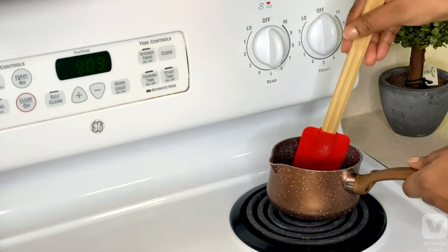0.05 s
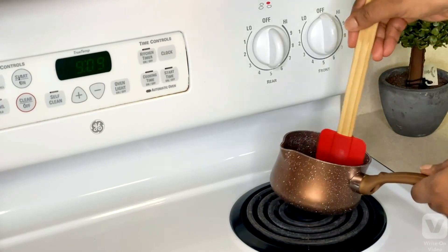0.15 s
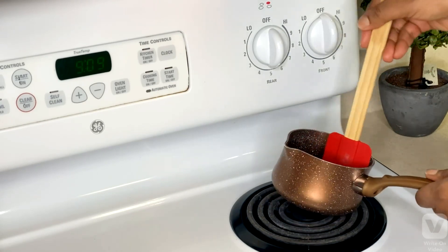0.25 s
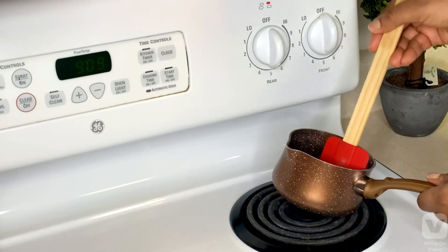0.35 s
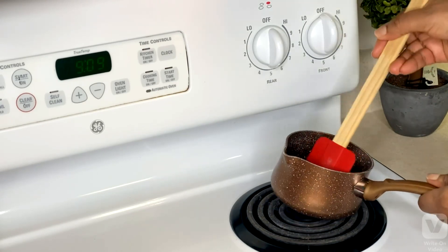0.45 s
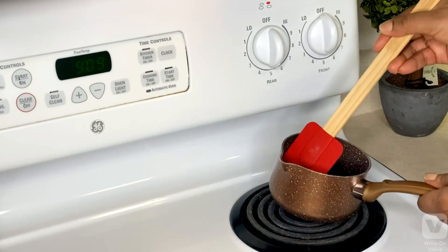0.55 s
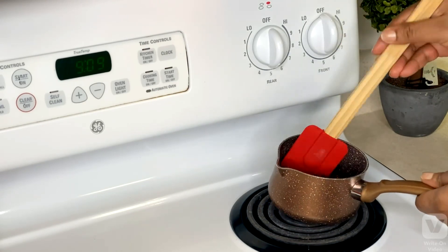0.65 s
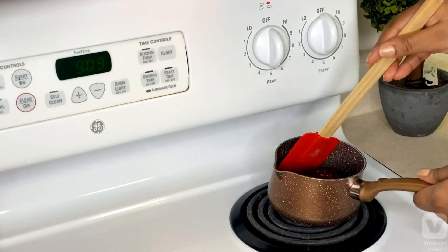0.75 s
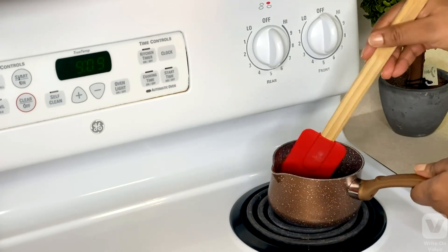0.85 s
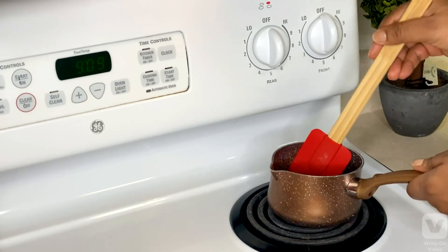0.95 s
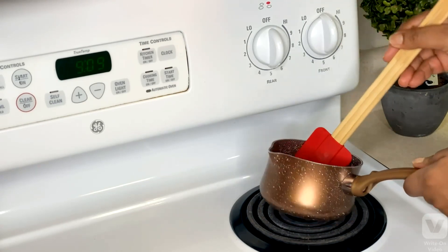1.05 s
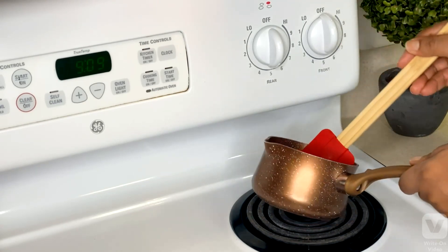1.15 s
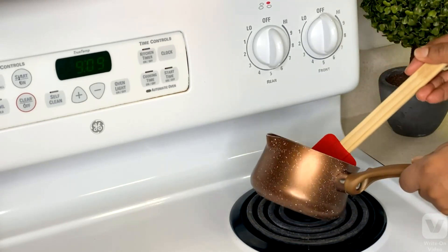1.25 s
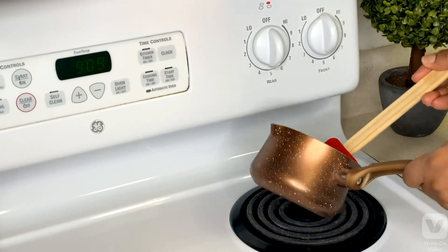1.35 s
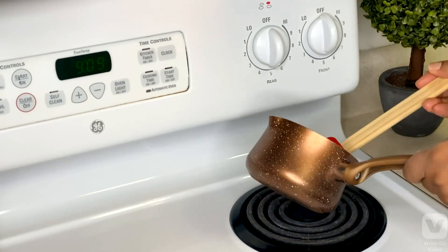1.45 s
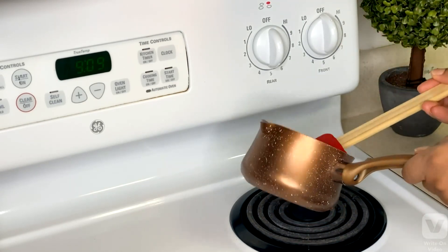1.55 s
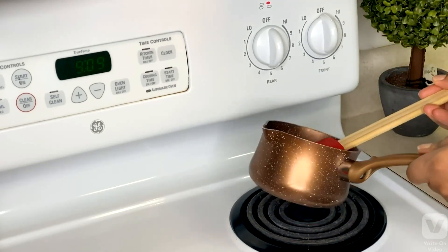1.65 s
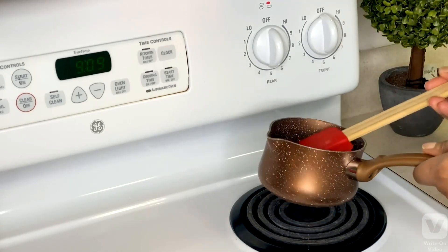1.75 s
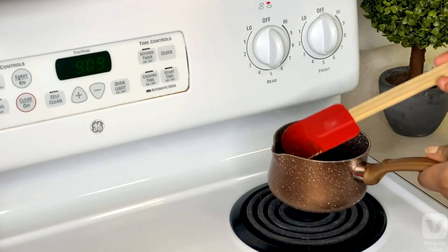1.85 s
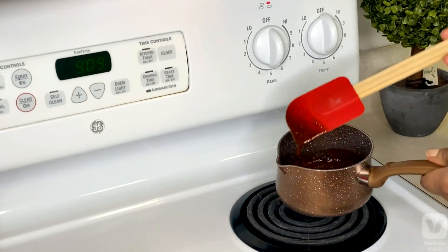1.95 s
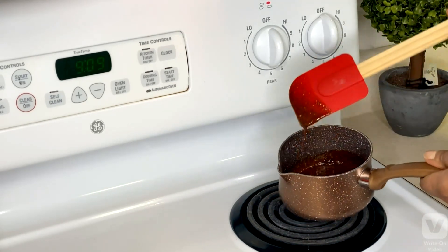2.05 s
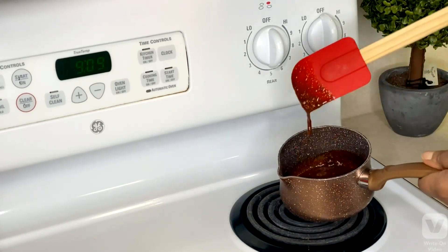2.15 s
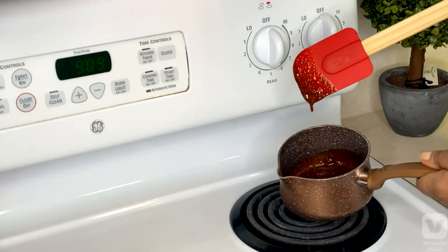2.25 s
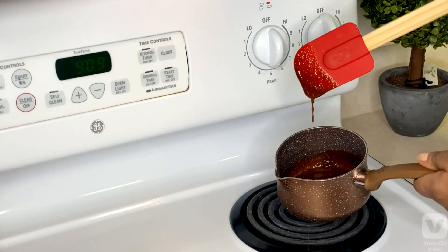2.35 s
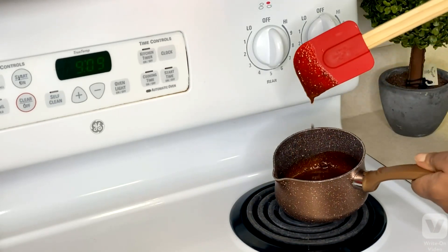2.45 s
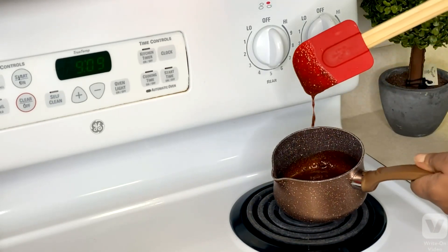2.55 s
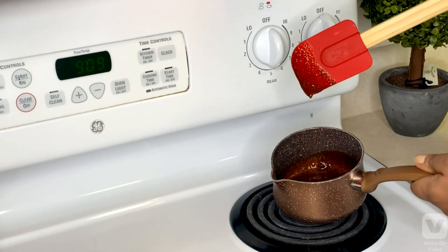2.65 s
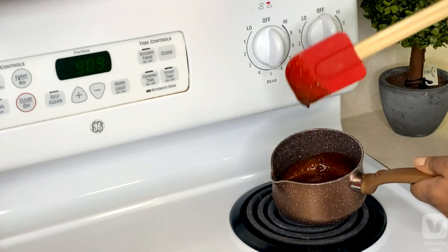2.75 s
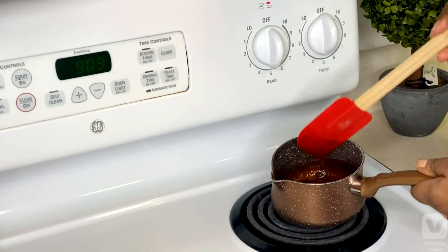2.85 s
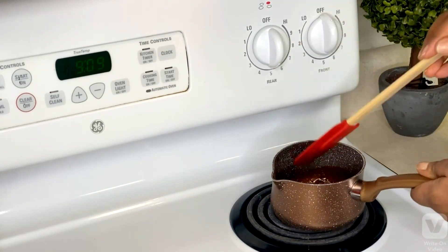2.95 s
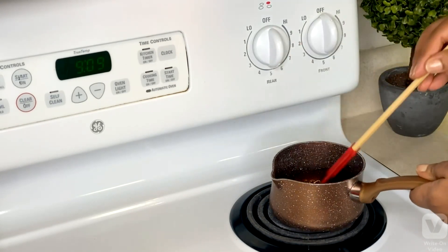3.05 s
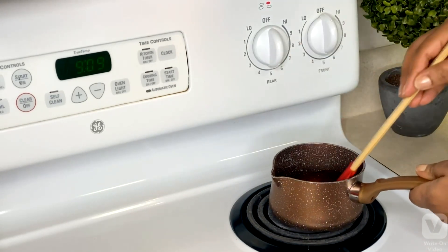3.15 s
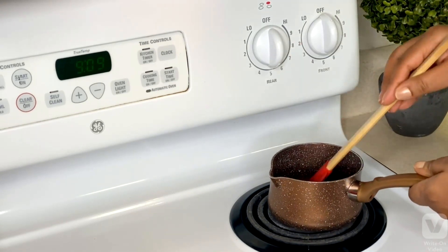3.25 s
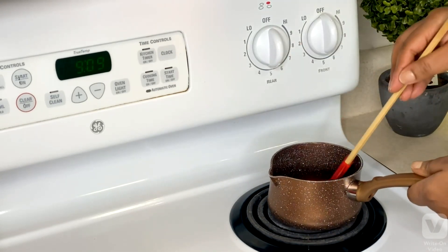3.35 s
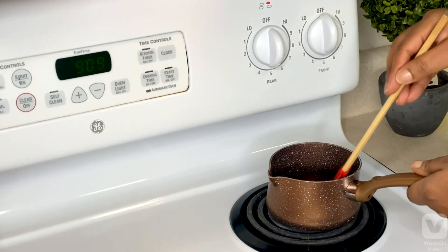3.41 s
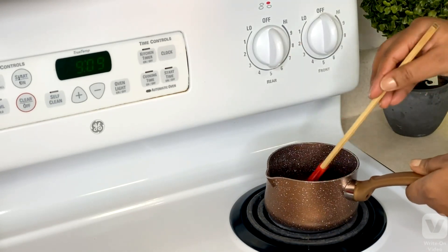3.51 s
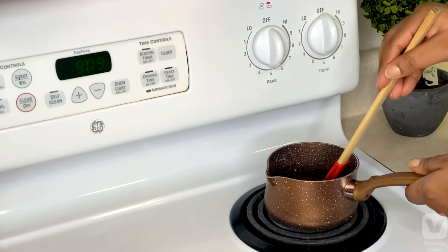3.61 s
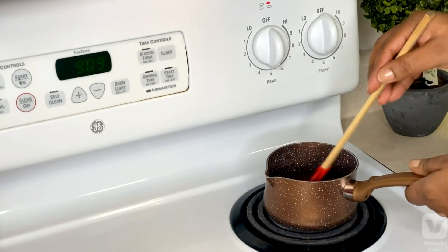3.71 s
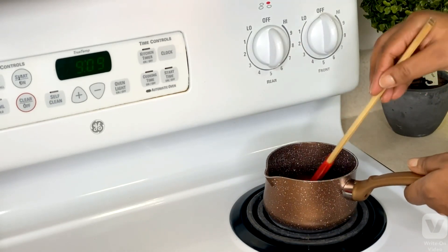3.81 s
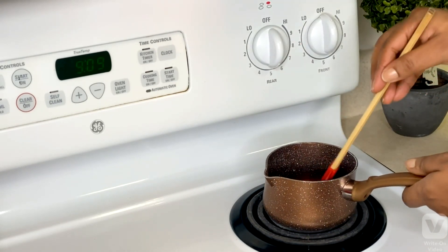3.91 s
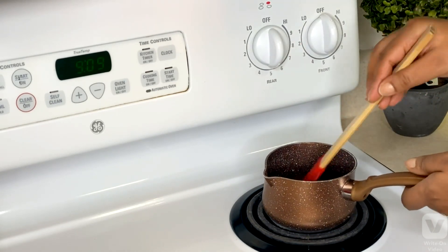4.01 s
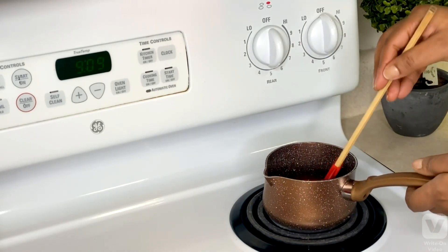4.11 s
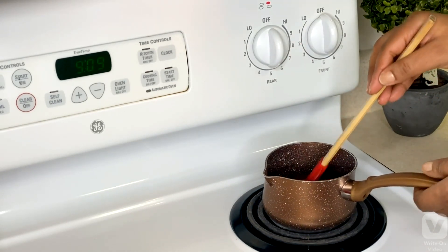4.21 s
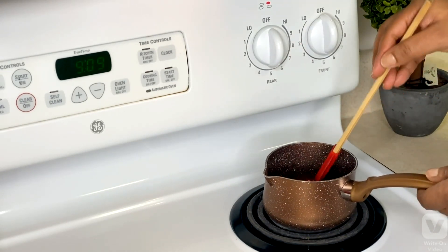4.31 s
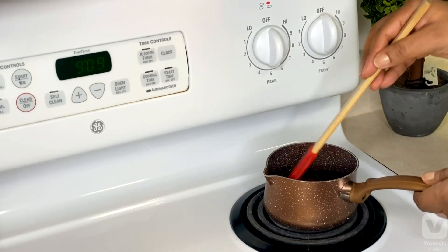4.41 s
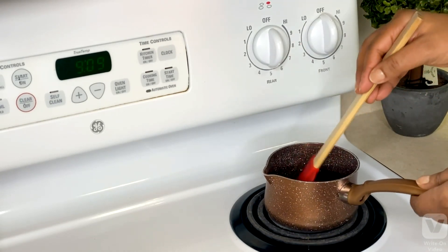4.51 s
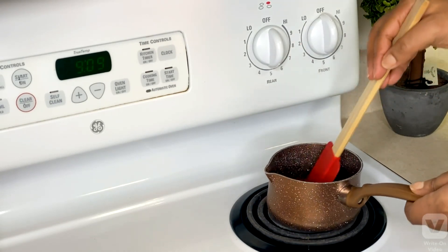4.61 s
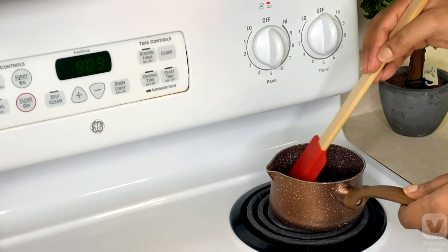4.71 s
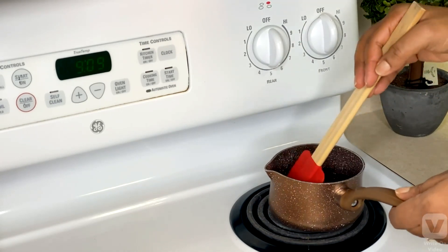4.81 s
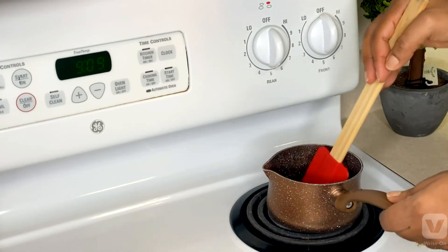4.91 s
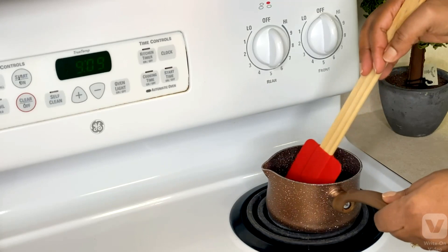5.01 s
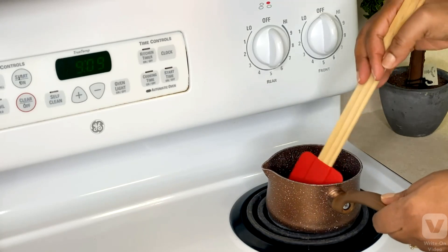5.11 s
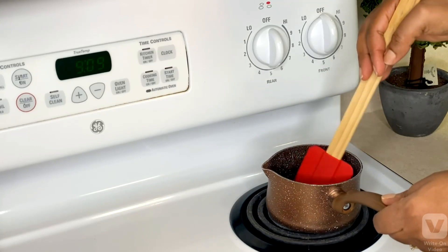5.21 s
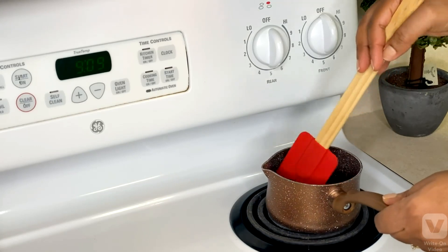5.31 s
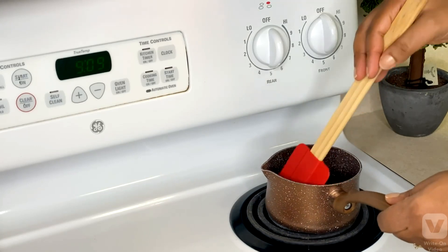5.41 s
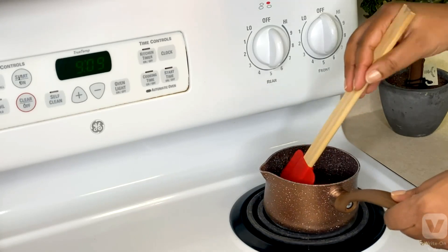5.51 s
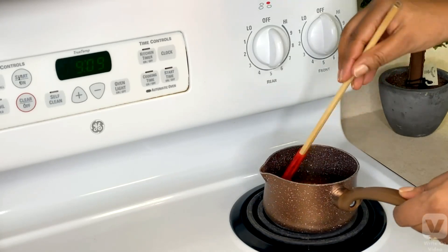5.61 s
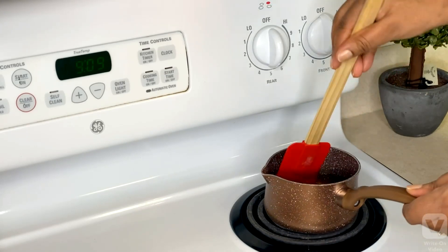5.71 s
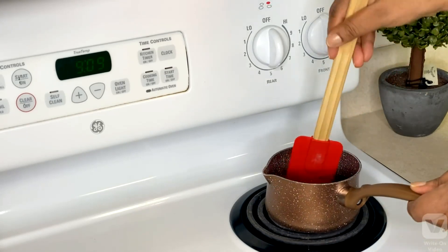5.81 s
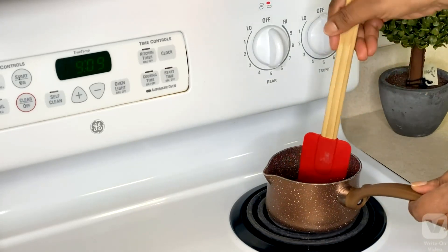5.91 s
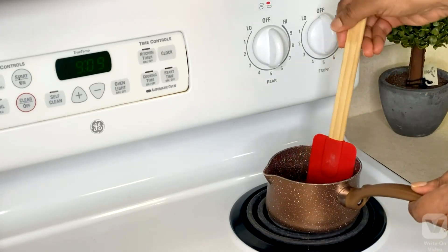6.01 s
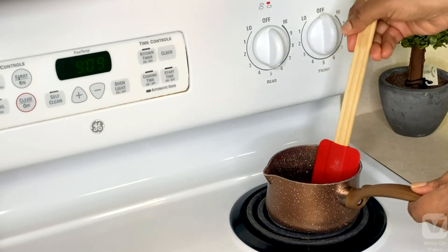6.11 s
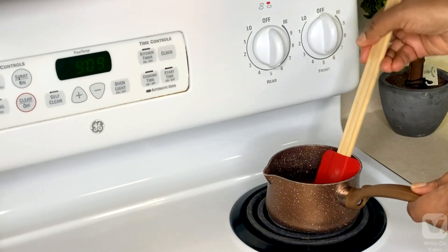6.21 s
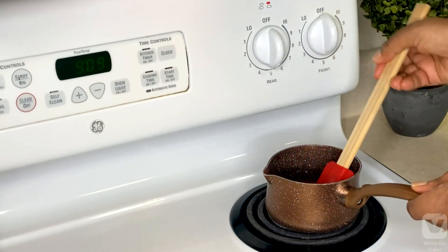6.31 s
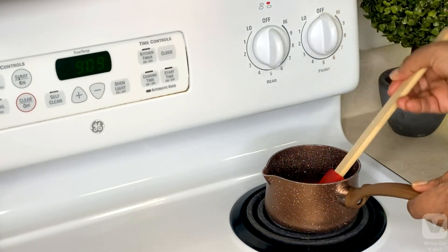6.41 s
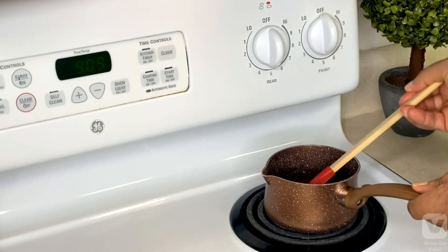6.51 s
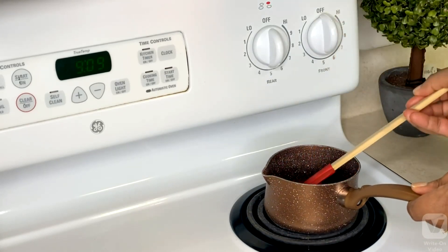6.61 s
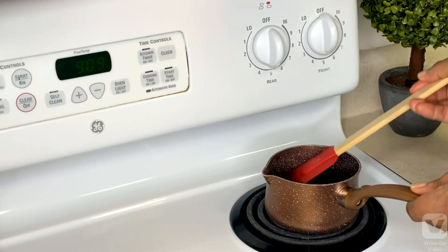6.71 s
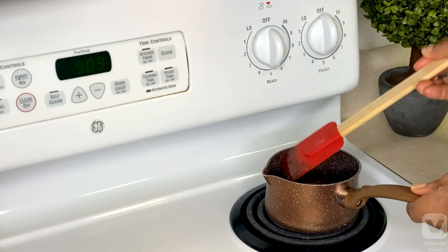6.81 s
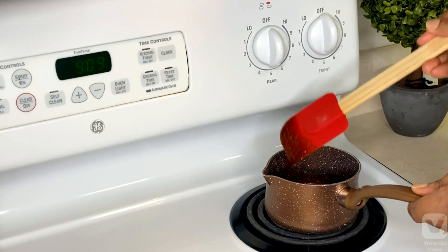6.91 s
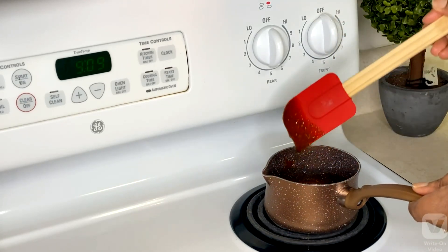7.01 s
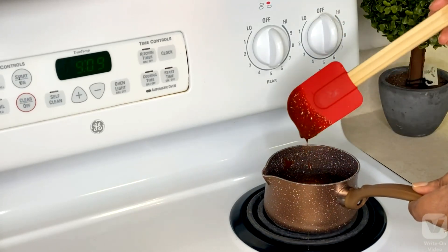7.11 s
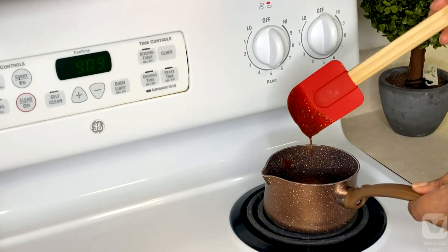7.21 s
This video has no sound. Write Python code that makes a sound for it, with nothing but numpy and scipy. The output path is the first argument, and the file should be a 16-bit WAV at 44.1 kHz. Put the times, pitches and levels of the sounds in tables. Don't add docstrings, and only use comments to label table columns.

```python
import sys
import numpy as np
from scipy import signal
from scipy.fft import rfft, irfft, next_fast_len
from scipy.io import wavfile
from scipy.ndimage import uniform_filter1d

SR = 44100
rng = np.random.default_rng(int(sys.argv[2]) if len(sys.argv) > 2 else 0)


def output_pcm(signal):
    pcm = np.clip(np.atleast_2d(signal).T, -1, 1) * 32767
    wavfile.write(sys.argv[1], SR, np.round(pcm).astype(np.int16))


def makeup_ratio(level_db):
    decades = np.asarray(level_db, float) / 20
    return 10 ** decades


N = 320166
T = np.arange(N) / SR
SPAN = 32768

# (pitch [Hz], level [dB], decay t60 [s])
PAN_MODES = [(198, -4, 0.3), (434, -8, .3), (503, -6, .25), (935, -8, .3), (720, -9, 0.2), (1060, -4, 0.3),
             (1190, -7, 0.3), (1620, -10, 0.3), (1952, -3, 0.25), (2100, -7, 0.17), (2600, -12, 0.25),
             (2960, -3, 0.35), (3322, -8, 0.4), (3472, -17, 0.4), (3760, -11, 0.121), (4040, -9, 0.2),
             (4540, -12, 0.23), (4900, -18, 0.25), (5480, -8, 0.35), (5712, -13, 0.093), (5930, -13, 0.4),
             (6519, -15, 0.46), (6880, -8, 0.25), (7040, -3, 0.4), (8060, -14, 0.2), (9470, -13, 0.3),
             (10030, -16, 0.24), (10410, -23.5, 0.14), (10580, -20, 0.16), (10730, -21, 0.18),
             (11120, -10, 0.4)]
LONGEST_T60 = 0.4


def colour(x, *spectra):
    size = next_fast_len(x.shape[-1] + 4096)
    log_hz = np.log(np.arange(4097) * SR / 8192 + 1)
    db = 0
    for points in spectra:
        hz, level_db = np.array(points).T
        db = db + np.interp(log_hz, np.log(hz), level_db)
    cepstrum = irfft(db * np.log(10) / 20)
    cepstrum[1:4096] *= 2
    cepstrum[4097:] = 0
    response = irfft(np.exp(rfft(cepstrum)))[:4096]
    return irfft(rfft(x, size) * rfft(response, size), size)[..., :x.shape[-1]]


def flat_top(points, top_hz=16000):
    return list(points[:-2]) + [(top_hz, points[-3][1])]


def unit(x):
    return x / np.sqrt(np.mean(x ** 2))


def walk(rate, size=N):
    hold = int(SR / rate)
    steps = np.repeat(rng.standard_normal(size // hold + 2), hold)
    return 1.355 * uniform_filter1d(steps, hold)[hold // 2:][:size]


def sway(spread_db, rate):
    return np.repeat(makeup_ratio(spread_db * walk(32 * rate, size=N // 32 + 1)), 32)[:N]


def ring(x, hz, t60):
    radius = np.exp(-np.log(1000) / (t60 * SR))
    turn = 2 * np.pi * hz / SR
    return signal.lfilter([0, np.sin(turn)], [1, -2 * radius * np.cos(turn), radius ** 2], x)


def grit(size, scatter_db):
    strength_db = scatter_db * np.minimum(rng.exponential(size=size), 3.5)
    return rng.standard_normal(size) * makeup_ratio(strength_db)


def efforts(table, column, rise_db_s, fall_db_s, rest_db):
    t = T[::128]
    power = makeup_ratio(2 * rest_db)
    for row in table:
        start, hold = row[0], row[1]
        early = np.maximum(start - t, 0)
        late = np.maximum(t - start - hold, 0)
        power = power + makeup_ratio(2 * (row[column] - rise_db_s * early - fall_db_s * late))
    return np.interp(T, t, 10 * np.log10(power))


def kitchen():
    # (frequency [Hz], level [dB per Hz])
    rumble_colour = [(15, -62.5), (25, -41.5), (58, -4), (92, -2.5), (121, -3.5), (145, -9.5), (207, -7.5),
                     (311, -13), (492, -22.5), (1030, -38.5), (1330, -34.5), (1430, -38), (8100, -49.5),
                     (9440, -47), (11000, -57), (14300, -90.5), (22000, -120)]
    # (pitch [Hz], level [dB])
    hums = [
        (119, -71),
        (9216, -93.5),
    ]
    noise = colour(rng.standard_normal(N), flat_top(rumble_colour)) * makeup_ratio(0.92 * walk(9.7))
    tones = sum(makeup_ratio(db + 1) * np.sin(2 * np.pi * hz * T) for hz, db in hums)
    return unit(noise) * makeup_ratio(-62.5) + tones


def patches(x, edges_hz, patchy_db, rate):
    spectrum = rfft(x)
    band = np.searchsorted(edges_hz, np.arange(N // 2 + 1) * SR / N)
    out = 0
    for k in range(len(edges_hz) + 1):
        out = out + irfft(spectrum * (band == k), N) * sway(patchy_db, rate)
    return out


def scrape():
    # (start [s], hold [s], wall scrape level [dB], sauce hiss level [dB])
    strokes = [(0, 0.034, -53.5, -61), (.08, 0.14, -70.5, -67.5), (.2, .15, -73, -69),
               (.37, 0.28, -100, -73.5), (.7, 0.12, -67, -70), (.82, 0.076, -64, -67.5),
               (.94, 0.33, -80, -69), (1.29, 0.13, -70, -68), (1.47, 0.27, -94, -69.5),
               (1.82, .6, -82, -87.5), (2.92, 0.077, -66.5, -78), (3.09, 0.11, -73, -63.5),
               (3.2, 0.16, -62, -70), (3.37, 0.049, -61, -63), (3.43, 0.16, -66.5, -67.5),
               (3.58, 0.31, -62, -68.5), (3.97, 0.2, -58, -66), (4.36, 0.03, -67.5, -84),
               (4.4, 0.11, -60.5, -71.5), (4.51, 0.2, -82, -80.5), (4.73, 0.038, -57, -65),
               (4.8, 0.047, -52.5, -63), (5.0, 0.16, -69, -74), (5.3, 0.055, -84, -74),
               (5.42, 0.045, -58.5, -61.5), (5.5, 0.14, -66, -71), (5.69, 0.043, -66, -70),
               (5.75, 0.24, -81, -85), (5.96, 0.48, -68, -74.5), (6.08, 0.33, -83, -72),
               (6.62, 0.06, -83, -92), (6.73, 0.035, -71.5, -65.5), (6.82, 0.62, -90, -101)]
    # (frequency [Hz], level [dB per Hz])
    wall_colour = [(240, -26), (400, -4.5), (606, 2), (780, -18.5), (1040, -3.5), (1120, -6), (2740, -9),
                   (4500, -11.5), (5850, -28), (9900, -120)]
    # (frequency [Hz], level [dB per Hz])
    sauce_colour = [(2060, -16.5), (3500, -10.5), (4700, -9.5), (5700, -3), (6980, -3), (7900, -7.5),
                    (8570, -5.5), (9480, -4.5), (11000, -15.5), (14300, -42.5), (22000, -120)]
    wall_db = efforts(strokes, column=2, rise_db_s=458, fall_db_s=240, rest_db=-100)
    hiss_db = efforts(strokes, column=3, rise_db_s=458, fall_db_s=480, rest_db=-92)
    hiss_db = np.minimum(hiss_db, -61)

    rub = grit(N, 3.8) * makeup_ratio(2 * walk(25))
    modes = 0
    for hz, db, t60 in PAN_MODES:
        modes = modes + ring(rub * makeup_ratio(db - 37) * sway(4, 9), hz, min(t60, LONGEST_T60) * 0.12)
    wall = unit(colour(rub + modes, wall_colour))
    wall = patches(wall, [650, 900, 1200, 1600, 2100, 2800, 3600], patchy_db=2.2, rate=16)
    wet = grit(N, 3.4) * makeup_ratio(walk(30)) + 0.82 * modes
    hiss = unit(colour(wet, flat_top(sauce_colour)))
    hiss = patches(hiss, [4500, 5600, 6800, 8400, 10000], patchy_db=2, rate=18)
    return wall * makeup_ratio(wall_db - 2) + hiss * makeup_ratio(hiss_db - 3)


def gliding(hz, width_hz):
    sos = signal.butter(1, width_hz / 2, fs=SR, output="sos")
    noise = [1, 1j] @ rng.standard_normal((2, SPAN + 4096))
    drive = signal.sosfilt(sos, noise[:len(hz)])
    return unit((drive * np.exp(2j * np.pi * np.cumsum(hz) / SR)).real)


def squeaks():
    # (start [s], length [s],
    # first pitch [Hz], glide [Hz per s], level [dB])
    singles = [(0.14, 0.06, 1220, 0, -70), (0.255, 0.05, 1330, 300, -71), (0.172, 0.04, 1640, 0, -68),
               (0.23, .1, 2850, 0, -73), (0.225, .04, 1580, 0, -71), (0, 0.065, 2100, 0, -67),
               (0.13, 0.07, 3380, 0, -73), (0.02, .16, 2750, 0, -72), (0.06, .07, 1800, 0, -70),
               (1.307, 0.08, 1705, 703, -70), (2.88, .07, 5950, 0, -73), (2.87, .05, 7050, 0, -70),
               (2.88, .07, 11100, 0, -76), (3.035, 0.013, 7100, 0, -58), (3.057, 0.013, 7100, 0, -62),
               (3.105, 0.015, 7000, 0, -68), (3.11, .1, 2830, 200, -66), (4.35, .04, 7550, 0, -76),
               (4.35, .08, 5400, 0, -77), (4.43, 0.09, 2950, 0, -70), (4.44, 0.07, 1000, 0, -64),
               (5.265, 0.08, 5300, 0, -76), (5.26, 0.07, 3200, 0, -78), (5.365, 0.05, 5200, 0, -76),
               (5.26, 0.09, 7500, 0, -74), (5.42, 0.045, 9600, 0, -75), (5.585, 0.04, 9600, 0, -78),
               (5.67, 0.05, 4950, 0, -76), (5.66, 0.07, 7700, 0, -75), (5.48, 0.13, 1950, 0, -74),
               (5.39, 0.43, 2600, -100, -75), (6.49, .03, 7200, 0, -83), (6.745, 0.02, 4750, 0, -76),
               (7.09, 0.2, 1860, -42, -81), (7.22, 0.06, 2600, 600, -84)]
    # (start [s], length [s], first pitch [Hz], level [dB])
    streaks = [(5.892, 0.15, 1874, -74.5), (5.94, 0.4, 1152, -65), (5.902, 0.18, 1700, -82),
               (5.933, 0.32, 4030, -77.5), (5.972, 0.17, 2620, -73), (5.988, 0.28, 2147, -67),
               (6.092, 0.13, 4540, -71.5), (6.147, 0.21, 2790, -72.5), (6.183, 0.17, 4180, -74.5),
               (6.195, 0.18, 3770, -76), (6.234, 0.21, 2570, -68.5), (5.946, 0.36, 1520, -87),
               (6.085, 0.15, 2125, -73)]
    rows = [(s, length, hz, glide, 100, db) for s, length, hz, glide, db in singles]
    rows += [(s, length, hz, 900, 0.055 * hz, db) for s, length, hz, db in streaks]
    out = np.zeros(N + SPAN)
    for start, length, first_hz, glide, width_hz, db in rows:
        flutter = walk(45, size=SPAN + 4096)
        waver = walk(18, size=SPAN + 4096)
        along = np.linspace(0, 1, min(int(length * SR), len(waver)))
        count = len(along)
        swell = np.clip(4 * np.minimum(along, 1 - along), 0, 1) * makeup_ratio(1.3 * flutter[:count])
        hz = (first_hz + glide * length * along) * (1 + 0.008 * waver[:count])
        out[int(start * SR):][:count] += makeup_ratio(db) * swell * gliding(hz, width_hz)
    return out[:N]


def stove():
    # (start [s], hold [s], level [dB])
    shifts = [(0, 0.14, -56), (.45, 0.017, -59), (1.27, 0.14, -57), (1.77, .03, -62), (2.27, .03, -65),
              (2.48, 0.018, -67), (2.62, 0.016, -63), (2.89, 0.026, -59), (3.05, 0.14, -56),
              (3.34, 0.018, -55), (3.88, 0.031, -53), (4.09, 0.073, -56), (4.37, 0.12, -57.5),
              (4.74, 0.12, -53), (5.05, 0.078, -54), (5.66, .02, -60), (6.36, 0.15, -64),
              (6.68, 0.034, -51.5), (6.9, 0.045, -66)]
    thud_db = efforts(shifts, column=2, rise_db_s=166, fall_db_s=143, rest_db=-65.5)
    boom = ring(ring(rng.standard_normal(N), 68.5, 0.13), 68, 0.041)
    return unit(boom) * makeup_ratio(thud_db - 3.5)


def blows(table, bass_db, modes_db, damping, spread_db, favour_db, favour_span, rise, scatter_db):
    # (frequency [Hz], level [dB per Hz])
    metal_colour = [(71, -53.5), (120, 0), (346, -5.5), (723, -2.5), (1730, -6), (2010, -2), (2290, -9),
                    (3040, -8), (6120, -20), (6860, -16.5), (11000, -27.5), (14300, -66.5), (22000, -120)]
    bass_per_peak = -0.52
    top_per_peak = 0.69
    out = np.zeros(N + SPAN)
    t = np.arange(SPAN // 3) / SR
    click = 1.0 * (t == 0)
    modes = np.array([makeup_ratio(db + modes_db) * ring(click, hz, min(t60, LONGEST_T60) * damping)
                      for hz, db, t60 in PAN_MODES])
    for s, peak_db, hz, treble_db, length in table:
        attack = (1 - np.exp(-t / rise)) ** 2
        push = grit(len(t), scatter_db) * attack * np.exp(-np.log(1000) * t / max(length, 0.005))
        gains = makeup_ratio(spread_db * (2 * rng.random(len(PAN_MODES)) - 3.5))
        body = signal.fftconvolve(push, click + gains @ modes)[:len(t)]
        favour = [(hz / favour_span, 0), (hz / 1.035, favour_db),
                  (hz * 1.035, favour_db), (hz * favour_span, 0)]
        low_db = bass_db + bass_per_peak * (peak_db + 46.5)
        top_db = treble_db + top_per_peak * (peak_db + 29.5) + 24.5
        tilt = [(130, low_db + 0.5), (200, low_db + 3), (620, 0.0029), (2500, 0.0038),
                (5000, treble_db + 17), (10000, treble_db + 18.5), (14000, top_db)]
        body = colour(body, flat_top(metal_colour), favour, tilt)
        loudest = np.sqrt(uniform_filter1d(body ** 2, 200).max())
        i = max(int((s - rise) * SR), 0)
        out[i:i + len(t)] += body * makeup_ratio(peak_db) / loudest
    return out[:N]


def shoves():
    # (time [s], peak level [dB], favoured pitch [Hz], treble [dB], length [s])
    slides = [(.002, -45.5, 1390, -18, 0.38), (.075, -49, 604, -23, 0.075), (.16, -54, 2500, -20, 0.11),
              (.185, -52, 2500, -15, .1), (.83, -46, 553, -40, 0.17), (.897, -33, 756, -14.5, 0.089),
              (3.095, -45, 1480, 0.5, 0.28), (3.195, -47, 890, -32, 0.26), (3.4, -49, 3750, -5.5, 0.26),
              (3.63, -41.5, 2250, -11.5, 0.27), (3.706, -39, 1690, -14.5, 0.073),
              (3.865, -37, 2770, -17, 0.31), (3.95, -36.5, 1580, -18, 0.084), (4.1, -39.5, 2750, -16, 0.25),
              (4.75, -42, 2960, -12, 0.22), (4.42, -43, 990, -28, 0.33), (4.52, -47.5, 860, -58, 0.47),
              (4.79, -39.5, 1050, -37, 0.36), (5.03, -37, 1070, -31, 0.23), (5.075, -35, 2110, -19, 0.11),
              (5.365, -50.5, 990, -29, 0.41), (5.6, -49, 800, -42, 0.14), (5.636, -45.5, 1020, -56, 0.13),
              (6.48, -47, 633, -56, 0.053), (6.5, -47.5, 1050, -35, 0.1)]
    return blows(slides, bass_db=7.5, modes_db=-35.5, damping=0.15, spread_db=4, favour_db=8.5,
                 favour_span=3.6, rise=0.012, scatter_db=3.5)


def ticks():
    # (time [s], peak level [dB], favoured pitch [Hz], treble [dB], rattle length [s])
    taps = [(0.158, -55, 2800, -12, 0.06), (0.185, -54, 3300, -11, 0.05), (0.272, -53, 2820, -22, 0.04),
            (0.323, -50.5, 1786, -12, 0.06), (0.452, -40.5, 5290, 1.5, 0.041),
            (0.572, -54.5, 1350, -3, 0.15), (0.77, -46, 1930, -15, 0.13), (1.227, -53.5, 2170, -8, 0.21),
            (1.4286, -49, 4830, -11, 0.16), (1.425, -48.5, 2110, -8, 0.17), (1.561, -53.5, 2560, -12, 0.05),
            (1.902, -55.5, 1730, -45, 0.097), (2.0288, -55.5, 1930, 1, 0.037),
            (2.2394, -55.5, 3580, -9, 0.079), (2.856, -40, 6940, 3, 0.072), (3.589, -29, 6900, 4, 0.073),
            (3.59, -38, 5570, 0, 0.12), (3.832, -28, 7050, 4, 0.066), (4.067, -33, 7000, 4, 0.09),
            (4.354, -56, 5300, -11, 0.06), (4.426, -47.5, 4000, -8, 0.067), (4.53, -53.5, 2980, -12, 0.068),
            (4.716, -24, 7000, 5, 0.07), (4.996, -29, 6900, -2, 0.028), (5.31, -52, 3350, -4, 0.059),
            (6.5, -53, 2960, -23, 0.043), (5.282, -57, 7350, -7, 0.28), (5.321, -49, 7540, 15, 0.046),
            (5.685, -50, 7800, 13, 0.16), (5.705, -53, 7550, 10, 0.086), (6.705, -61, 7660, 6, 0.1),
            (6.73, -62, 5320, -3, 0.078), (6.746, -55, 7020, 4, 0.1), (6.752, -51, 2060, -6.5, 0.053)]
    return blows(taps, bass_db=-10, modes_db=-70, damping=0.15, spread_db=3, favour_db=13.5,
                 favour_span=1.05, rise=0.0043, scatter_db=4.5)


def snaps():
    # (time [s], peak level [dB], pitch [Hz])
    threads = [(0.4894, -49, 5280), (1.775, -47, 7400), (1.9031, -64, 5260), (1.937, -56, 9560),
               (2.0344, -51, 9210), (2.3844, -58, 9210), (4.297, -61, 10500), (4.298, -49, 13500),
               (5.165, -47.5, 9230), (5.884, -52, 9400), (6.169, -44.5, 4070), (7.175, -51.5, 4350),
               (7.2094, -71, 4400)]
    out = np.zeros(N + SPAN)
    t = np.arange(1024) / SR
    for s, peak_db, hz in threads:
        peaked = [(hz / 10, -30), (hz / 1.1, -5), (hz, 0), (hz * 1.14, -6), (hz * 2.9, -15)]
        burst = colour(grit(len(t), 6.9) * np.exp(-t / 0.0038), peaked)
        out[int(s * SR):][:len(t)] += burst * makeup_ratio(peak_db - 4.5) / np.abs(burst).max()
    return out[:N]


def knocks():
    # (time [s], peak level [dB], favoured pitch [Hz], treble [dB], rattle length [s])
    hits = [(0.66, -47.5, 2090, -20, 0.18), (0.813, -45, 1360, -61, 0.23), (0.874, -37, 990, -37, 0.15),
            (1.286, -36.5, 1780, -13, 0.041), (2.851, -30, 1960, -16.5, 0.11), (2.853, -33, 585, -18, 0.18),
            (3.036, -40.5, 2150, -13, 0.11), (3.059, -38.5, 1250, -16.5, 0.085),
            (3.334, -42.5, 980, -15, 0.13), (3.342, -42, 695, -16, 0.16), (3.338, -45, 1980, -15, 0.13),
            (3.584, -30, 1960, -8, 0.12), (3.585, -29.5, 1130, -12, 0.057), (3.595, -30, 706, -25, 0.1),
            (3.827, -26, 1960, -11.5, 0.24), (3.828, -26.5, 1140, -17, 0.036),
            (3.84, -30.5, 720, -26, 0.22), (4.061, -23.5, 1952, -9, 0.13), (4.062, -29, 1550, -16, 0.088),
            (4.075, -29, 202, -27, 0.14), (4.163, -40, 2230, -24, 0.066), (4.381, -40.5, 990, -25, 0.2),
            (4.714, -25.5, 480, -13, 0.15), (4.711, -21.5, 974, -10.5, 0.06), (4.72, -31, 410, -35, 0.067),
            (4.716, -36, 2100, -14, 0.11), (4.99, -32, 1080, -16, 0.26), (4.993, -33, 2870, -13.5, 0.16),
            (5.306, -45, 211, -33, 0.15), (5.306, -58, 2110, -18, 0.042), (6.497, -64, 1990, -29, 0.073),
            (6.651, -42.5, 2020, -25, 0.044), (6.652, -45.5, 3230, -22, 0.065),
            (6.653, -47, 720, -24, 0.25)]
    return blows(hits, bass_db=4, modes_db=-26, damping=0.22, spread_db=10, favour_db=9,
                 favour_span=1.25, rise=0.0015, scatter_db=0.5)


def judder():
    # (time [s], peak level [dB])
    slips = [(0.992, -59.5), (1.049, -61.5), (1.102, -63.5), (1.163, -60.5), (1.228, -60), (1.362, -66),
             (1.432, -57.5), (1.511, -61.5), (1.584, -57.5), (1.669, -59), (1.765, -64)]
    # (pitch [Hz], level [dB], decay t60 [s])
    blade_modes = [(870, -9, 0.04), (2160, -12, 0.03), (2600, -7, 0.04), (3280, -14, 0.02),
                   (4100, -11, 0.02), (6080, -3, 0.02), (7170, -2, 0.025), (9600, -8, 0.008)]
    since = T - np.array(slips)[:, :1]
    fades = (since > 0) * np.exp(-np.abs(since) / 0.018)
    push = grit(N, 1.7) * (makeup_ratio(np.array(slips)[:, 1]) @ fades)
    modes = sum(makeup_ratio(db) * ring(push, hz, t60) / np.sqrt(t60 * SR / 28) for hz, db, t60 in blade_modes)
    dry_rub = colour(push, [(700, -23), (2000, 9), (5000, -4), (11000, -30)])
    return (modes + makeup_ratio(-3) * dry_rub) * makeup_ratio(-10.5)


def bounces():
    # (time [s], pitch [Hz], peak level [dB])
    landings = [
        (1.309, 81, -44),
        (1.352, 72, -42.5),
        (1.408, 66.1, -46.5),
    ]
    out = 0
    for s, hz, db in landings:
        swell = np.exp(-0.5 * ((T - s) / 0.011) ** 2)
        out = out + makeup_ratio(db) * swell * np.sin(2 * np.pi * (hz * T + rng.random()))
    return out


def room(x, wet_db):
    # (band centre [Hz], decay t60 [s])
    decays = [(250, 0.38), (1000, 0.26), (3000, 0.18), (8000, 0.14)]
    t = np.arange(SPAN) / SR
    tail = 0
    for hz, t60 in decays:
        sos = signal.butter(1, [hz / 1.6, hz * 2.23], "band", fs=SR, output="sos")
        band = signal.sosfilt(sos, rng.standard_normal(SPAN))
        tail = tail + band * np.exp(-np.log(1000) * t / t60)
    tail = tail * np.clip(t / 0.0082, 0, 1)
    power = np.abs(rfft(tail)[1:]) ** 2
    lumps_db = 10 * np.log10(uniform_filter1d(power, size=30) / uniform_filter1d(power, size=500))
    tail = colour(tail, np.c_[np.arange(1, len(power) + 1) * SR / SPAN, -lumps_db])
    return x + makeup_ratio(wet_db) * signal.fftconvolve(x, tail / np.sqrt(np.sum(tail ** 2)))[:N]


def scene():
    struck = (knocks() + shoves()) * makeup_ratio(-8.5) + ticks() * makeup_ratio(-15)
    near = room(struck + snaps() + judder(), wet_db=-8.5)
    under = scrape() + squeaks() + stove() + bounces() + kitchen()
    return (near + under)[None]


def roll_off(x):
    return signal.sosfilt(signal.butter(12, 15760, fs=SR, output="sos"), x)


def record(dry):
    # (frequency [Hz], gain [dB])
    port = [(8000, 1), (8420, -2.5), (8520, -22), (8640, -12), (9000, 0.5), (11100, 2.5), (11600, -15),
            (12000, -28.5), (12400, -35.5), (13000, -10), (13900, -19.5), (14700, -21), (15600, -46),
            (16000, -78.5)]
    return roll_off(colour(dry, port))


dry = scene()
out = record(dry)
output_pcm(out)
```